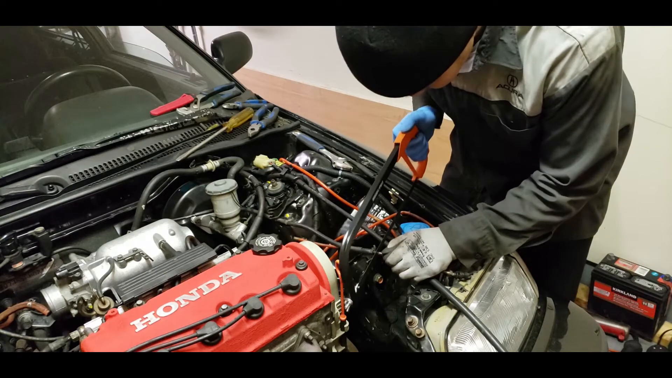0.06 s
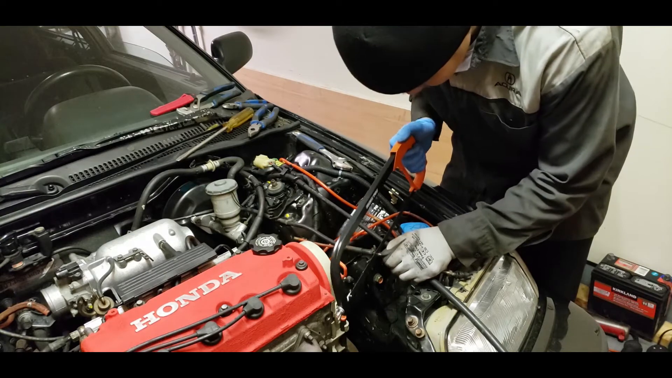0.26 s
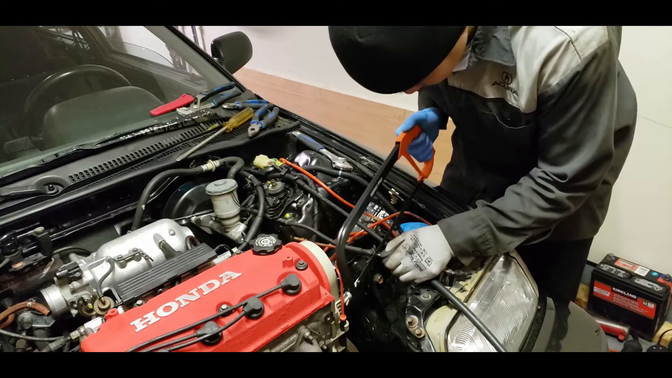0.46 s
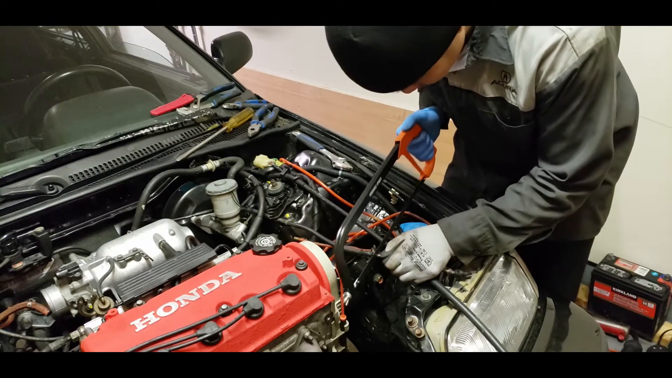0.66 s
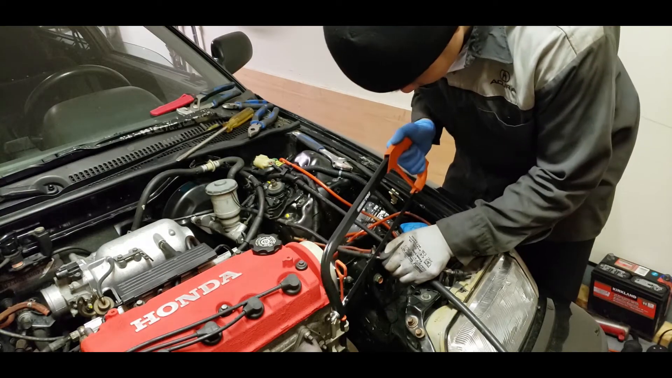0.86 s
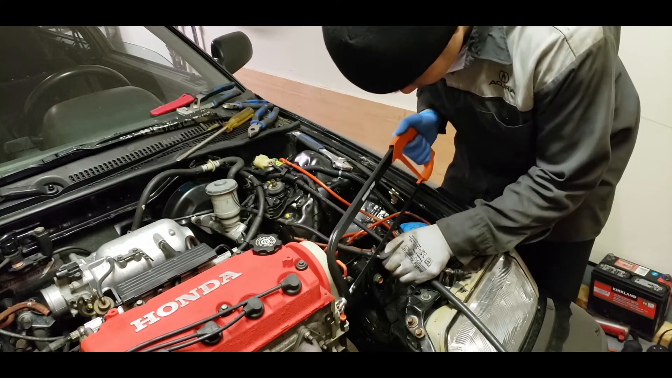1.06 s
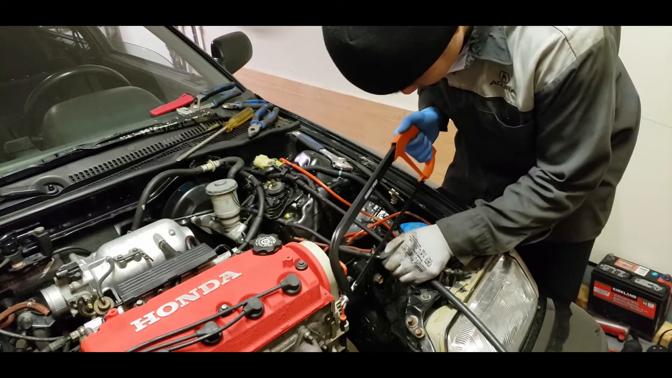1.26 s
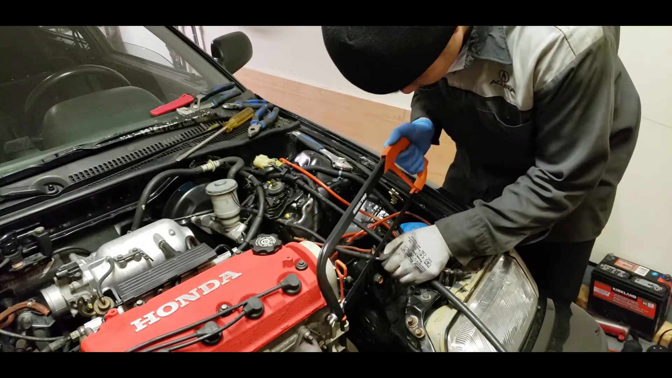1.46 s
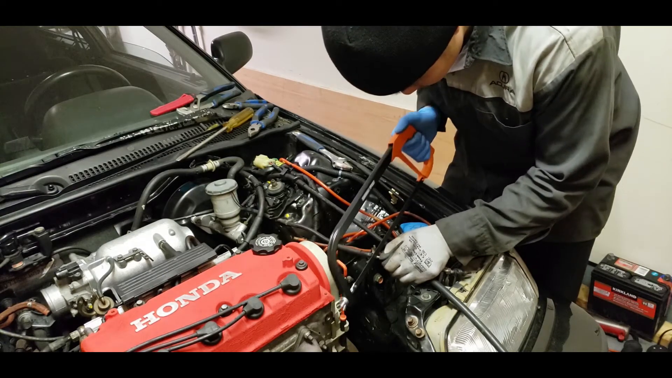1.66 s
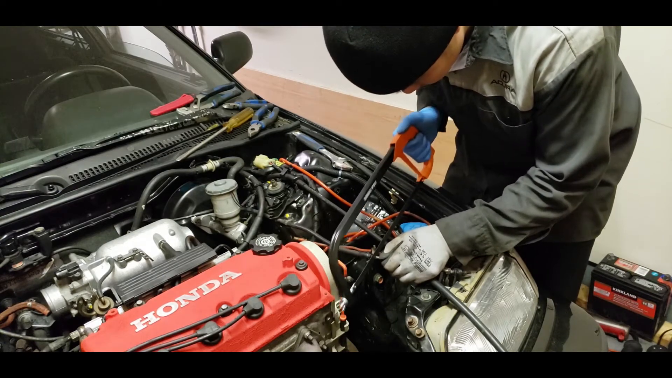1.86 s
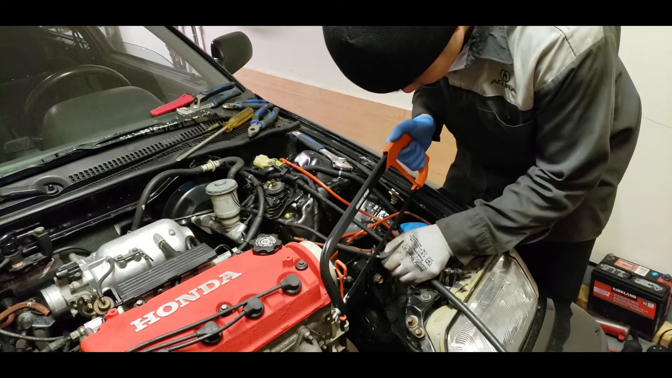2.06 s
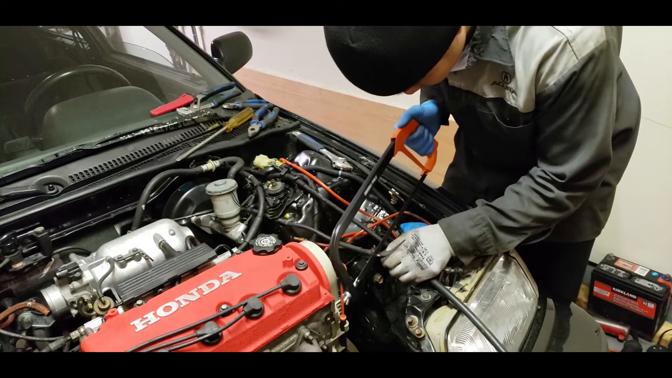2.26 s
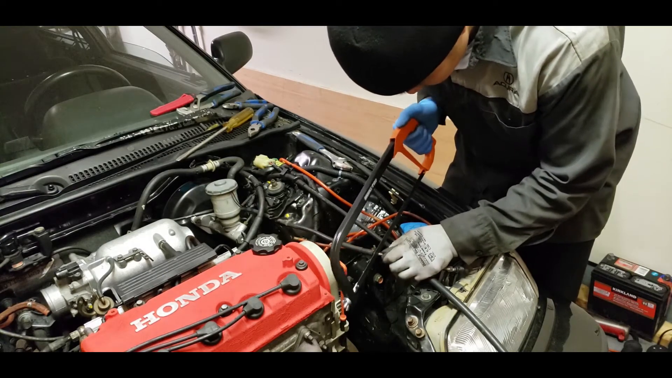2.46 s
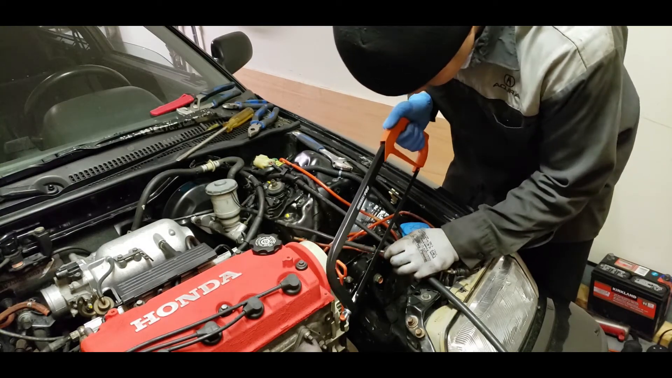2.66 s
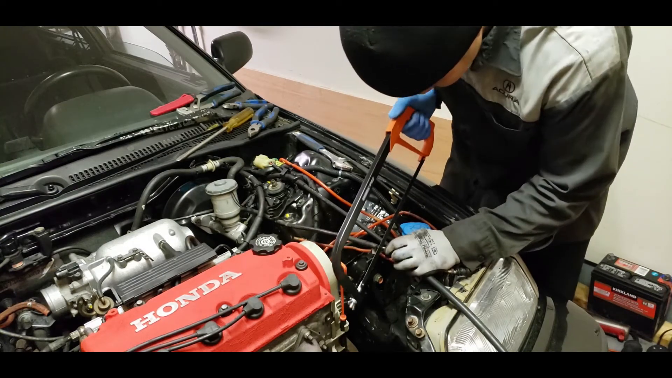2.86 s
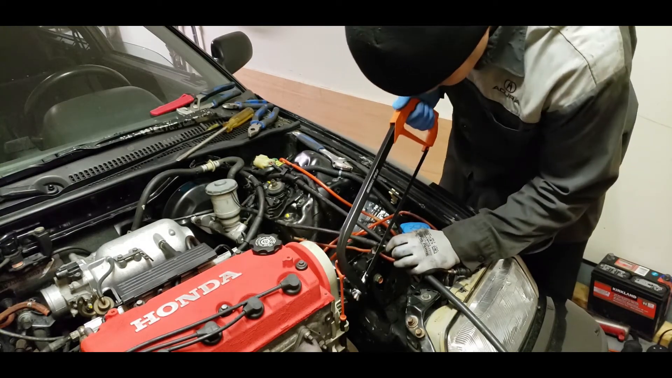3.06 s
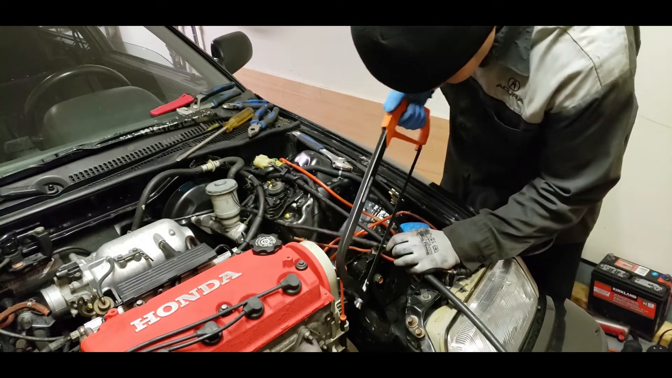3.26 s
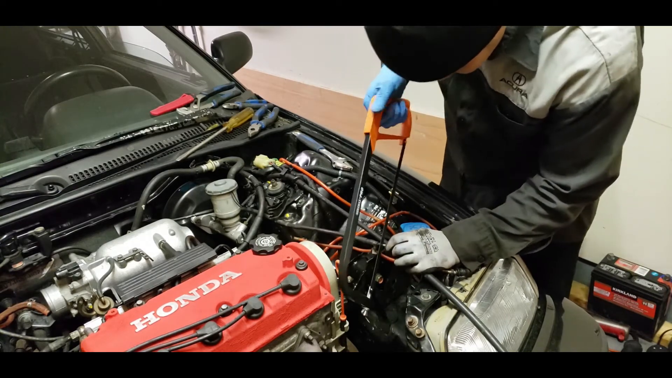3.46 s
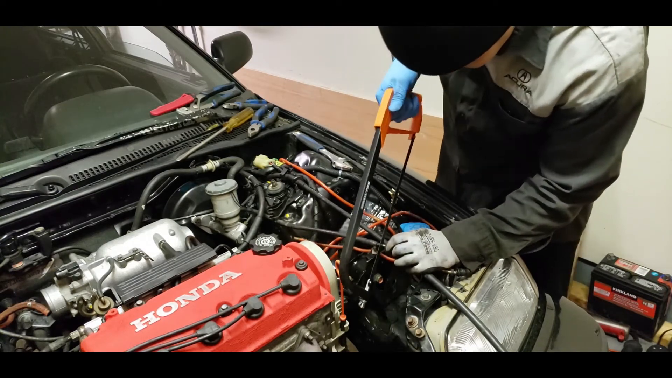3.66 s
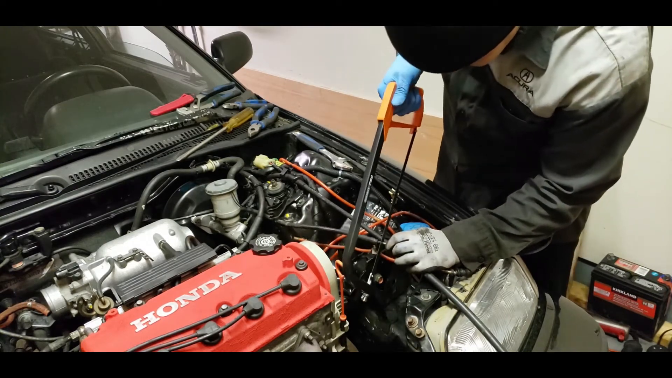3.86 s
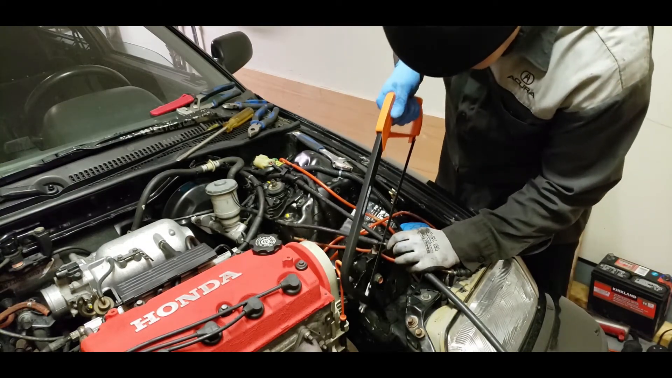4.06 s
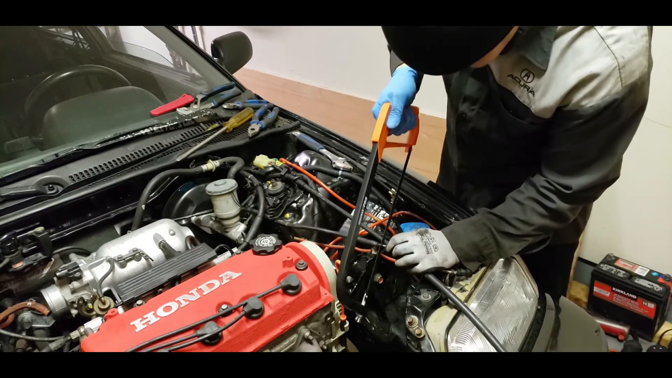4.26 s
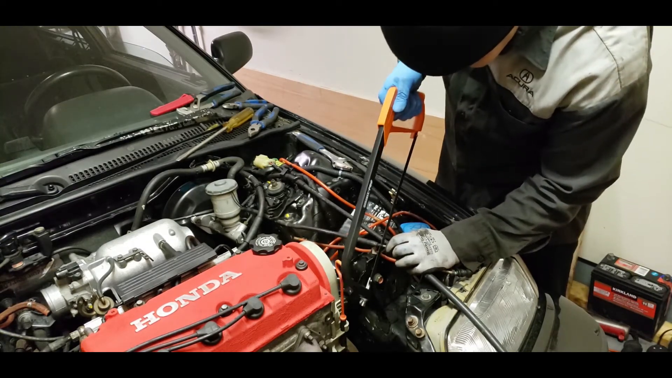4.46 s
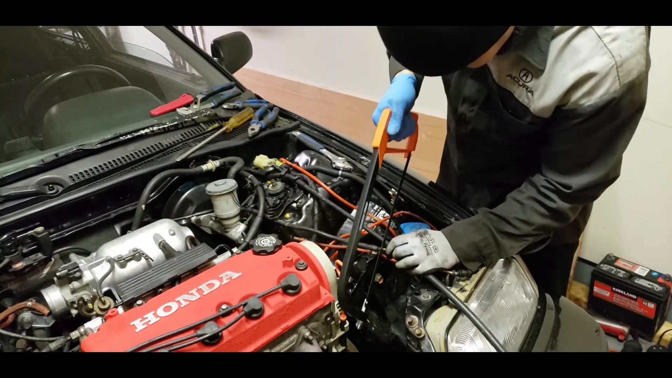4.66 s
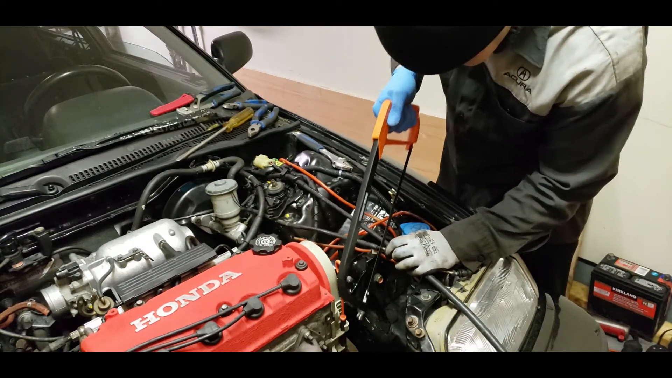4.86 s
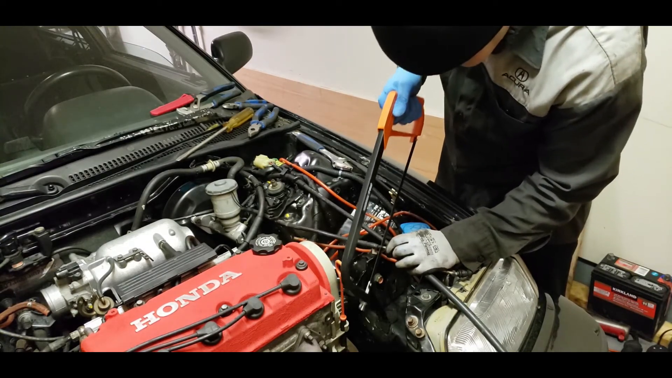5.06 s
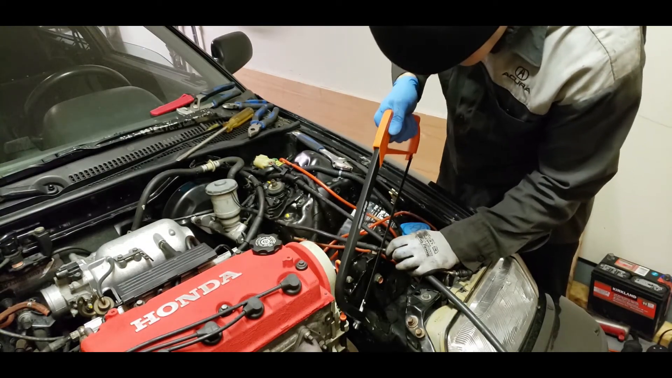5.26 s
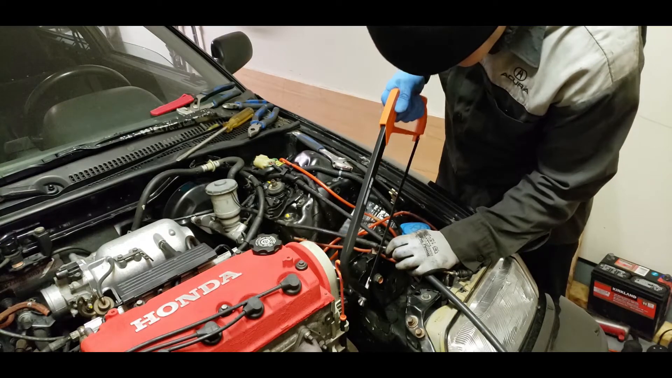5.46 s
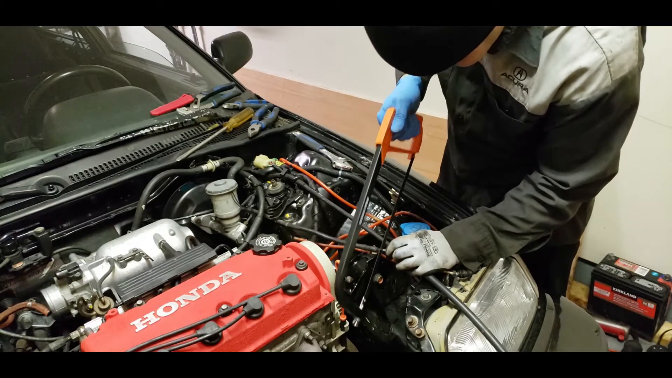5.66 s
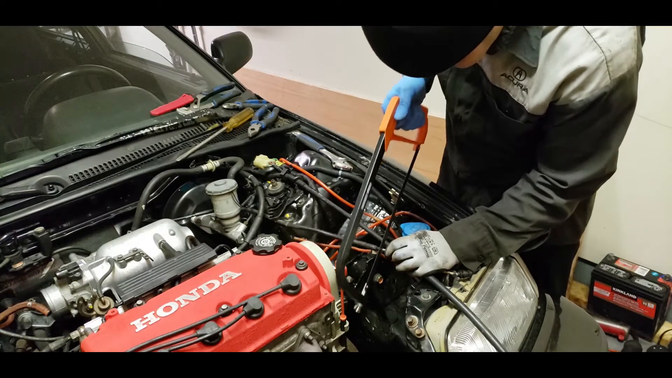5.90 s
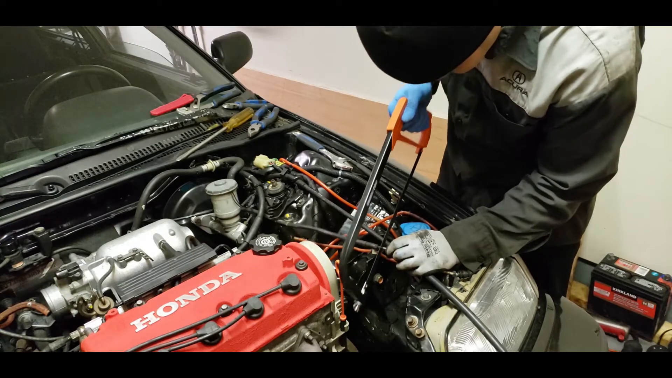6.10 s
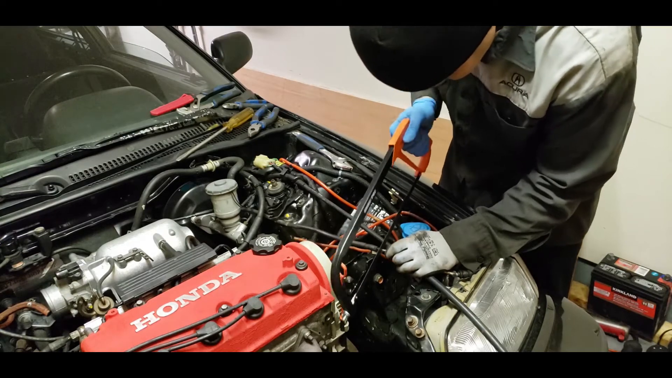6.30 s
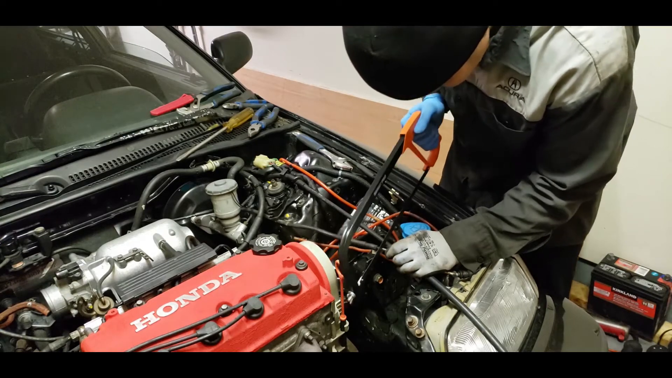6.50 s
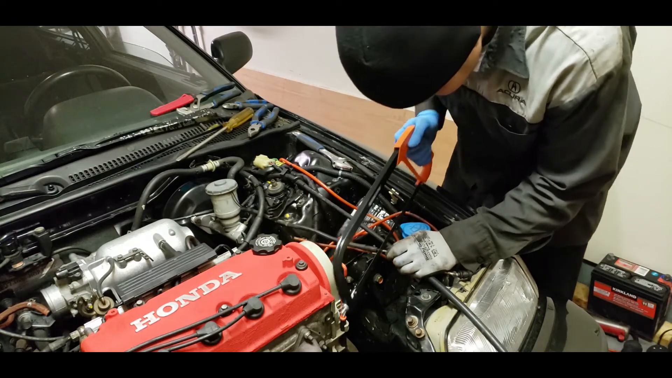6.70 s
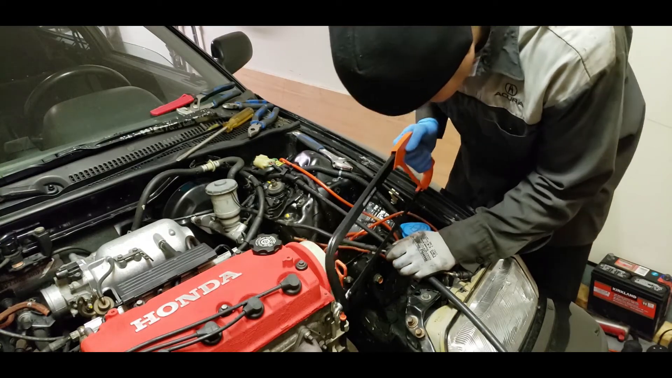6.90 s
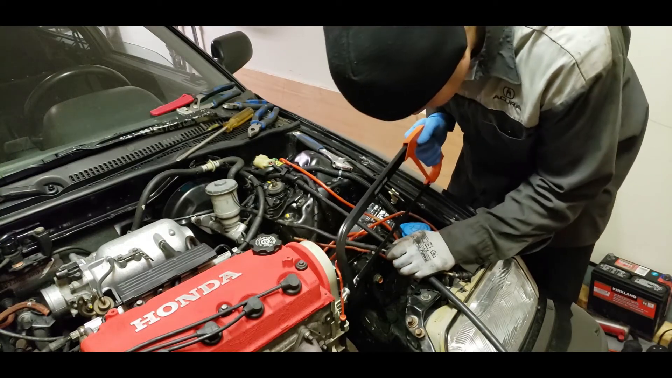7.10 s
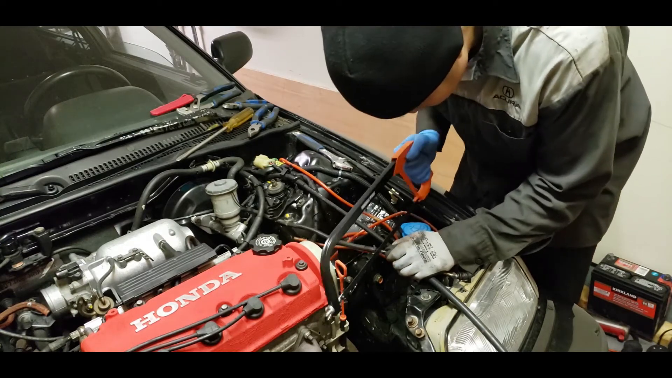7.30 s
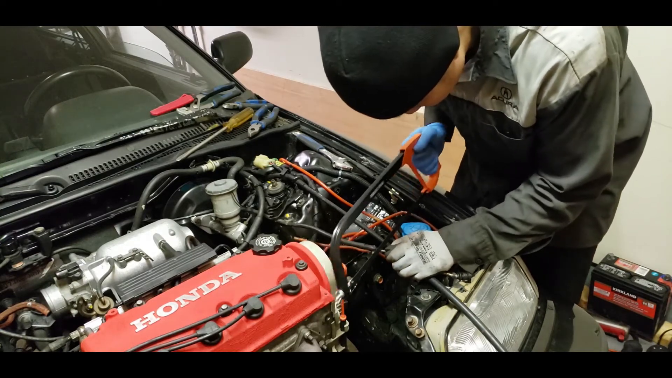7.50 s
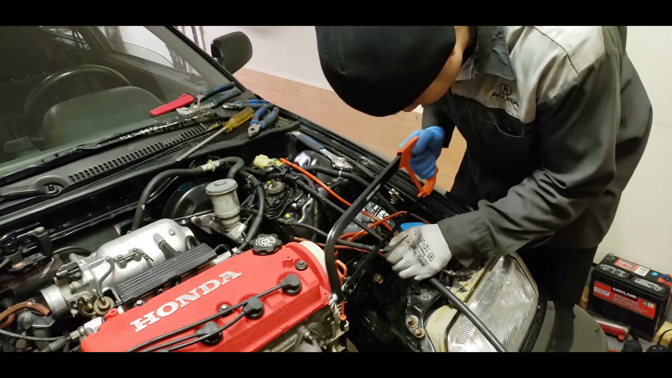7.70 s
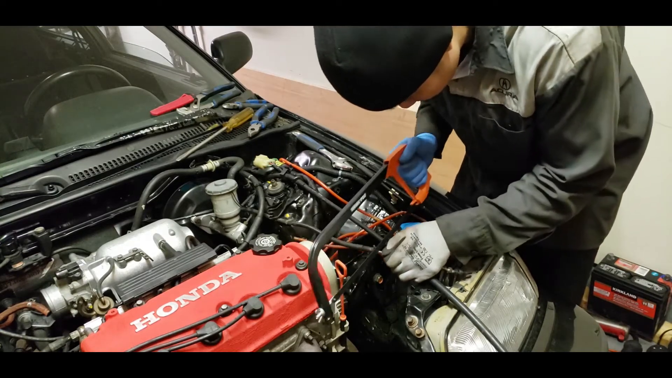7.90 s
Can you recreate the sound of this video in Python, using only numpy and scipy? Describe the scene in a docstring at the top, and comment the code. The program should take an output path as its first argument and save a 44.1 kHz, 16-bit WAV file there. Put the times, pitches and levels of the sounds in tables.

```python
"""A hand hacksaw rasps back and forth through a coiled steel housing in an engine bay, in a garage.
Random tooth catches, thousands a second, excite the resonances of blade, tooth edge, saw frame,
bodywork, chassis and housing. Some seconds in, the saw knocks against metal as decaying pushes into a
resonator; a few light strokes reseat it and it cuts on. Two close microphone ports hear each sound
directly and by sparse reflections, over a faint shaped noise of garage and microphone."""
import sys
import numpy as np
from scipy import signal
from scipy.fft import rfft, irfft
from scipy.io import wavfile
from scipy.ndimage import uniform_filter1d

SR = 44100
rng = np.random.default_rng(int(sys.argv[2]) if len(sys.argv) > 2 else 0)


def rack_gain(trim_db):
    """Turn a fader trim in dB into the linear factor to multiply a signal by."""
    fader = np.asarray(trim_db, float)
    return 10 ** (fader / 20)


def put_to_file(sound):
    """Save the sound as 16-bit audio at rate SR, in the file named by the first command-line argument."""
    columns = np.atleast_2d(sound).T  # one column per channel
    safe = np.clip(columns, -1, 1)
    whole_steps = np.round(safe * 32767)
    wavfile.write(sys.argv[1], SR, whole_steps.astype(np.int16))


N = 350208
RATTLE_S = 2.605  # onset of the rattle and shaking at the hard knock


def saw(share, gains):
    """Source-filter principle: the same catches ring every part, each as hard as the strokes drive it."""
    # resonant modes: f/Hz, width between -6 dB points/Hz, relative level/dB
    blade_modes = [(2094, 98, -10), (2619, 132, -5.5), (3550, 23, -3.5), (3905, 106, -5.5), (4460, 23, -1),
                   (4663, 860, -2.5), (5650, 22, -34), (5680, 370, -8), (6570, 240, -4.5),
                   (6914, 123, -2.5), (7450, 370, -8.5), (7970, 21, -1), (8700, 115, 0.5), (9380, 280, 3),
                   (10020, 150, 2.5), (10400, 57, -25), (11000, 34, -1), (11630, 79, 0.5),
                   (12900, 200, -12), (13500, 130, -15), (14000, 32, -28), (14700, 100, -32),
                   (15130, 110, 1.5)]
    frame_modes = [(490, 59, -6.5), (529, 63, -8.5), (587.8, 52, 1), (630, 28, -25), (710, 8.2, -4.5),
                   (927, 93, -6), (957, 93, -9.5)]
    body_modes = [(137, 11.6, 2), (198, 10.5, -3.5), (226, 13, -18), (266, 11, -13.5), (324.5, 42, -10)]
    chassis_modes = [(73, 24, -10.5), (84.7, 25, 5.5)]
    housing_modes = [(1130, 130, -9), (1294, 57, -10)]
    # broad sound between the modes: f/Hz, relative level/dB
    blade_wash = [(1500, -42), (1950, -29.5), (2300, -13.5), (2800, -18.5), (3100, -17), (3500, -17),
                  (4700, -17), (6000, -15.5), (8200, -15.5), (9200, -44), (11000, -39)]
    edge_wash = [(7500, -86), (8500, -12.5), (10000, -8.5), (12500, -5.5), (14000, -9.5), (15700, -6.5)]
    frame_wash = [(250, -62), (400, -27.5), (600, -12.5), (900, -19), (1080, -18), (1250, -25), (1600, -63)]
    body_wash = [(60, -48), (110, -19), (250, -7.5), (400, -18.5), (600, -53)]
    chassis_wash = [(20, -67), (40, -6), (100, -16), (160, -41)]
    housing_wash = [(800, -36), (1100, -19.5), (1400, -7), (1800, -14.5), (2000, -16), (2500, -48.5)]
    # hard catches of the teeth, mostly at stroke starts, some later or at the knock:
    # t/s, relative level/dB
    hard_catches = [(0.0628, -50), (0.0902, -45), (0.3391, -43), (0.3706, -52), (0.7013, -42), (1.011, -44),
                    (1.2885, -43), (1.3194, -44), (1.3395, -34.5), (1.882, -36.5), (1.928, -33),
                    (2.144, -38), (2.1619, -38), (2.4558, -43.5), (2.604, -38), (2.8222, -51),
                    (2.9549, -42), (3.0225, -44), (3.248, -60), (3.5274, -49.5), (3.6651, -49),
                    (3.848, -51), (4.054, -54), (4.0756, -59), (4.326, -45), (4.374, -33.5), (4.6, -38),
                    (4.8565, -36), (5.3636, -39.5), (5.3855, -41), (5.6171, -40), (5.8476, -41),
                    (6.113, -34.5), (6.65, -41), (7.199, -36), (7.439, -38), (7.702, -41)]
    edge_from_hz = 8600

    drive = share * teeth(per_s=5000, spread_db=2.5, judder_db=1.5)
    scuff = np.exp(-np.arange(600) / 130) * rng.standard_normal(600)  # a few ms of crowded catches
    bite = share * signal.oaconvolve(impulses(hard_catches), scuff)[:N]
    low_modes = [m for m in blade_modes if m[0] < edge_from_hz]
    high_modes = [m for m in blade_modes if m[0] >= edge_from_hz]
    parts = [(rack_gain(1.0) * bite, low_modes, blade_wash),
             (rack_gain(1.5) * bite, high_modes, edge_wash),
             (0, frame_modes, frame_wash),
             (0, body_modes, body_wash),
             (0, chassis_modes, chassis_wash),
             (0, housing_modes, housing_wash)]
    total = np.zeros(N)
    for gain, (extra, modes, wash) in zip(gains, parts):
        response = ring(shifted(modes, detune=0.0068, scatter_db=3.0), wash)
        total += signal.oaconvolve(drive * gain + extra, response)[:N]
    return total


def teeth(per_s, spread_db, judder_db):
    """Random impulse train: irregular catches of uneven size, in clumps as the blade judders; rms 1."""
    catches = (rng.random(N) < per_s / SR) * rng.choice([-1., 1.], N)
    size_db = spread_db * np.minimum(rng.exponential(1, N), 4)
    judder = uniform_filter1d(uniform_filter1d(rng.standard_normal(N), 300), 300)
    x = catches * rack_gain(size_db + judder_db * judder / judder.std())
    return x / x.std()


def impulses(rows):
    """Impulsive excitation: one spike for each event."""
    x = np.zeros(N)
    s, db = np.transpose(rows)
    x[(s * SR).astype(int)] = rack_gain(db)
    return x


def shifted(modes, detune, scatter_db):
    """Position-dependent excitation: from another spot the modes are a little off in pitch and strength."""
    chance = rng.standard_normal((len(modes), 2))
    return [(hz * (1 + detune * a), width, db - scatter_db * abs(b))
            for (hz, width, db), (a, b) in zip(modes, chance)]


def ring(modes, wash, size=8192):
    """Modal superposition on a broad spectrum, as a causal minimum-phase response of energy 1."""
    hz = abs(np.fft.fftfreq(size, 1 / SR))
    power = rack_gain(read(wash, hz)) ** 2
    for mode_hz, width, db in modes:
        power = power + rack_gain(db) ** 2 / (1 + (2 * (hz - mode_hz) / width) ** 2) ** 2
    log_gain = np.log(power) / 2
    phase = -signal.hilbert(log_gain).imag  # minimum phase follows from the log magnitude
    taps = np.fft.ifft(np.exp(log_gain + 1j * phase)).real[:size // 2]
    return taps / np.linalg.norm(taps)


def read(points, hz):
    """Interpolation of a spectrum table along a logarithmic frequency axis."""
    f, value = np.transpose(points)
    return np.interp(np.log(hz + 1), np.log(f + 1), value)


def efforts():
    """Shared excitation: how hard blade, edge, frame, bodywork, chassis and housing are driven over time."""
    # how firmly the housing presses on the bodywork: t/s, level/dB
    brace_points = [(0, 2.5), (.45, 0), (.8, 2.5), (1.2, 0.5), (2, 2), (2.5, -1), (3, 1.5), (3.5, -1),
                    (4.1, 3.3), (4.6, 0), (5.2, -0.6), (5.8, 0.5), (6.2, -2), (6.6, -1.5), (7.1, 1.5),
                    (7.4, -3), (7.94, 0)]
    braced = rack_gain(np.interp(np.arange(N) / SR, *np.transpose(brace_points)))
    rasp = follow(over_db=0.21, pull_db=-0.07, short_db=1, build_s=0.03, fade=1, weight=0, grip=0)
    edge = follow(over_db=-0.68, pull_db=0.35, short_db=3.5, build_s=0.034, fade=1.05, weight=0.24, grip=0.19)
    frame = follow(over_db=-3.0, pull_db=0.3, short_db=4.5, build_s=0.041, fade=0.79, weight=0.75, grip=-0.057)
    body = follow(over_db=-6, pull_db=-0.5, short_db=9, build_s=0.043, fade=0.61, weight=0.93, grip=0)
    chassis = follow(over_db=-21.5, pull_db=-1.0, short_db=1.5, build_s=0.068, fade=0.43, weight=0.26, grip=.1)
    housing = follow(over_db=-17, pull_db=-1.5, short_db=5.5, build_s=0.048, fade=0.92, weight=0.47, grip=1)
    return [rasp,
            edge,
            frame + shaken(db=-41.5, dying_db_per_s=80),
            braced * body + shaken(db=-57, dying_db_per_s=158),
            chassis + rocking(),
            housing + shaken(db=-46, dying_db_per_s=94)]


def follow(over_db, pull_db, short_db, build_s, fade, weight, grip):
    """Envelope of one part by power summation of strokes: build-up, sagging hold, exponential decay."""
    # strokes, push and pull in turn: start t/s, rise/s, hold/s, effort level/dB, downward weight/dB
    full_strokes = [(0.058, 0.077, 0.066, -39.5, -0.5), (0.338, 0.061, 0.14, -41, -2),
                    (0.689, 0.11, 0.076, -39.5, 0.5), (0.985, 0.064, 0.12, -40.5, -2.5),
                    (1.291, 0.092, 0.088, -38.5, 0.5), (1.56, 0.079, 0.12, -39.5, -1.5),
                    (1.865, 0.062, 0.091, -38, 1), (2.129, 0.043, .11, -38, -3),
                    (2.44, 0.066, 0.043, -44.5, -1), (2.815, 0.0048, 0.095, -48, -9),
                    (3.255, 0.029, 0.0045, -48.5, -7), (3.319, 0.02, 0.024, -46.5, -1),
                    (3.526, .01, 0.032, -60, -5.5), (3.661, .015, 0.085, -52, -8),
                    (4.063, 0.016, .12, -38, -5.5), (4.364, 0.011, 0.083, -40.5, -4.5),
                    (4.596, 0.022, 0.11, -37.5, -3), (4.847, 0.045, 0.072, -36.5, -7),
                    (5.1, 0.043, 0.099, -39, -1.5), (5.351, 0.041, 0.076, -38, -4.5),
                    (5.611, 0.029, 0.083, -37, -2), (5.846, 0.021, 0.11, -34.5, -7),
                    (6.108, 0.044, 0.075, -32.5, -6.5), (6.359, 0.023, 0.13, -40.5, -1.5),
                    (6.641, 0.044, 0.12, -37, -1), (6.911, 0.031, 0.12, -40.5, -2),
                    (7.178, 0.095, 0.066, -36, -1), (7.426, 0.055, .08, -38.5, 0),
                    (7.677, 0.034, 0.11, -35.5, -2)]
    # brief slips of the blade without a full stroke: start t/s, rise/s, hold/s, effort level/dB,
    # downward weight/dB
    brief_slips = [(0.024, 0.012, 0.0089, -73, 11), (1.328, 0.011, 0.018, -43.5, -1.5),
                   (2.16, .006, .01, -49, -9), (5.86, .006, 0.019, -43, -1), (2.518, 0.011, 0.025, -41, -1),
                   (2.96, 0.0045, 0.032, -53.5, -2), (3.247, 0.0017, .01, -68, -10),
                   (3.39, 0.0088, 0.022, -66, -12), (3.828, 0.0045, 0.0042, -66, -8),
                   (4.05, 0.0033, 0.012, -51.5, -11), (4.323, 0.0055, 0.013, -44, -11),
                   (6.46, .01, 0.032, -43, -6), (7.04, .01, 0.018, -51, 0), (7.163, .02, .02, -51, 6)]
    # how firmly the housing is gripped in the cut, before each part's factor: t/s, level/dB
    grip_points = [(0, -0.5), (1, -0.5), (2, 0.5), (2.6, 1.5), (3.2, -4), (3.9, -2), (4.2, 2.5), (4.5, -6),
                   (4.8, 3), (5.3, 3.5), (6, 2), (6.5, -2), (6.8, 2), (7.2, 1.5), (7.55, 4.5), (7.94, 6)]
    rise_bend = 0.69  # the blade speeds up along this power of time
    sag_db_per_s, stop_db_per_s = 48.5, 228  # through the hold, then to a stop; both scaled by fade

    start, rise, hold, effort_db, weight_db = np.transpose(full_strokes + brief_slips)[:, :, None]
    index = np.arange(len(start))[:, None]
    pulled = index % 2 * (index < len(full_strokes))
    t = np.arange(0, N + 44, 44) / SR  # envelope points every 44 samples
    since = np.maximum(t - start, 0)
    rise, hold = np.maximum(rise, .002), np.maximum(hold, 0)  # no rise is quicker than 2 ms
    sag_db = sag_db_per_s * np.clip(since - rise, 0, hold)
    stop_db = stop_db_per_s * np.maximum(since - rise - hold, 0)
    unbuilt_db = short_db * np.exp(-(since / build_s) ** 2)  # still missing early in a stroke
    db = effort_db + weight * weight_db + pull_db * pulled - unbuilt_db - fade * (sag_db + stop_db)
    stroke_gain = np.minimum(since / rise, 1) ** rise_bend * rack_gain(db)
    gain = np.sqrt((stroke_gain ** 2).sum(axis=0))
    grip_db = grip * np.interp(t, *np.transpose(grip_points))
    return np.interp(np.arange(N) / SR, t, gain * rack_gain(over_db + grip_db))


def shaken(db, dying_db_per_s):
    """Free decay: a gain that jumps at the hard knock and dies away exponentially."""
    since = np.arange(N) / SR - RATTLE_S
    return (since > 0) * rack_gain(db - dying_db_per_s * abs(since))


def rocking():
    """Low-frequency body motion: one soft Gaussian swell of drive for each jolt."""
    # the car rocks as a stroke pulls up: t/s, peak level/dB
    car_jolts = [(.21, -48), (.5, -58), (.865, -43), (1.14, -60), (1.45, -50), (1.98, -57), (2.07, -54),
                 (2.58, -52.5), (2.93, -61), (3.07, -63), (3.17, -70), (3.34, -58), (3.62, -64),
                 (3.83, -65), (3.93, -73), (4.14, -52), (4.5, -49), (4.72, -60), (4.82, -53), (4.95, -52),
                 (5.06, -59), (5.205, -49), (5.29, -47), (5.78, -45), (5.87, -51), (5.95, -55), (6.07, -62),
                 (6.285, -50), (6.48, -51), (6.6, -59), (6.75, -60), (7.27, -48.5), (7.36, -51),
                 (7.65, -58)]
    swell_s = 0.026  # from the peak to 1/e
    swell = np.exp(-(np.arange(-4000, 4001) / SR / swell_s) ** 2)
    return abs(signal.oaconvolve(impulses(car_jolts), swell, "same"))


def knock():
    """Impact excitation: short damped pushes ring the struck metal; loose parts rattle on after the knock."""
    # a soft tap, then one hard knock whose pitch falls from high to low within 32 ms:
    # t/s, level/dB, push f/Hz
    knock_pushes = [(0.049, -43.5, 1320), (2.604, -16, 3620), (2.607, -16.5, 2580), (2.612, -22, 1920),
                    (2.615, -34, 1200), (2.624, -42, 1020), (2.636, -32.5, 523)]
    # modes of the struck metal: f/Hz, width between -6 dB points/Hz, relative level/dB
    struck_modes = [(608, 50, -19), (1147, 130, 3.5), (1920, 200, -6), (2790, 240, -8), (3850, 550, -8)]
    # broad sound between them: f/Hz, relative level/dB
    struck_wash = [(200, -20), (500, -4), (1500, -11.5), (4000, -12.5), (5500, -10), (9000, -51)]
    n = np.arange(9000)
    pushes = np.zeros(N)
    for s, db, hz in knock_pushes:
        cycles = n[:900] * hz / SR
        start = round(s * SR)
        push = np.exp(-cycles / 0.91) * np.sin(2 * np.pi * cycles)  # a cycle or two long
        pushes[start:start + len(cycles)] += rack_gain(db) * push
    start = round(RATTLE_S * SR)
    rattle = np.exp(-n / 2400) * rng.standard_normal(len(n))
    pushes[start:start + len(n)] += rack_gain(-37.5) * rattle
    return signal.oaconvolve(pushes, ring(struck_modes, struck_wash))[:N]


def ports():
    """Room impulse response: direct path to each port, then sparse reflections with t60 set by frequency."""
    # reverberation time of the garage: f/Hz, t60/s
    garage_t60 = [(80, 0.61), (500, 0.46), (2000, 0.43), (6000, 0.56), (15000, 0.31)]
    # room over direct sound: f/Hz, level/dB
    wet_points = [(60, -7), (300, -0.5), (700, 4), (1200, 2.5), (2500, 5), (5000, -3), (8000, -1),
                  (14000, 0)]
    # left channel over right: f/Hz, level/dB
    lean_points = [(25, -0.5), (60, -3.5), (150, -1), (380, 0), (950, 0.6), (2380, 2), (5000, 3),
                   (8500, 5.5), (10000, -3)]
    # share of the tail common to both channels; the top treble is made mono: f/Hz, share (0-1)
    common_points = [(40, 0.62), (200, 0.97), (600, 0.41), (1100, 0), (7500, 0.01), (9200, 0), (10000, 1),
                     (15000, 1)]
    # phase between the channels in the direct sound; a whole turn, so in phase, at the top:
    # f/Hz, phase/rad
    phase_points = [(60, 0.42), (600, 0.4), (2700, 0.5), (4400, -1.95), (7000, -1.5), (8400, -5),
                    (9800, -2 * np.pi)]

    taps = np.zeros((2, SR))
    slots = np.arange(120, SR - 20, 20)  # one reflection in each 20 samples
    at = slots + rng.integers(0, 20, (2, len(slots)))
    np.put_along_axis(taps, at, rng.choice([-1., 1.], at.shape), axis=1)
    hz, t, z = signal.stft(taps, SR, nperseg=512)
    t60 = np.maximum(read(garage_t60, hz), .05)[:, None]
    level_1 = np.sqrt(20 * 2 * np.log(1000) / (t60 * SR))  # brings the tail near energy 1
    z = z * rack_gain(-60 * t / t60) * level_1
    left, other = rfft(signal.istft(z, SR, nperseg=512)[1][:, :SR])

    hz = np.fft.rfftfreq(SR, 1 / SR)
    common = np.clip(read(common_points, hz), 0, 1)
    tail = np.array([left, common * left + np.sqrt(1 - common ** 2) * other])
    sides = np.array([[.5], [-.5]])  # half of each difference goes to either channel
    delay = 2j * np.pi * hz * 64 / SR  # 64 samples
    direct = np.exp(1j * sides * read(phase_points, hz) - delay)
    wet = rack_gain(read(wet_points, hz))
    mixed = (direct + wet * tail) / np.sqrt(1 + wet ** 2)
    return irfft(mixed * rack_gain(read(lean_points, hz) * sides), SR)


def air():
    """Stationary background noise: white noise shaped to the faint hiss of garage and microphone."""
    # quiet of the garage: f/Hz, relative level/dB
    air_points = [(18, -44), (30, 0), (126, -2), (420, -13), (945, -23), (1500, -18), (3300, -20),
                  (6700, -18), (8300, -25), (13600, -16), (15500, -30)]
    hz = np.fft.rfftfreq(N, 1 / SR)
    x = irfft(rfft(rng.standard_normal((2, N))) * rack_gain(read(air_points, hz)), N)
    return rack_gain(-72.5) * x / x.std()


def scene():
    """Linear superposition: the cut wanders over spots of the blade, each with its own ring and room path."""
    spots, spot_s = 13, .1  # spots along the blade, seconds from one to the next
    spot = np.arange(N) / SR / spot_s
    gains = efforts()
    out = air() + signal.fftconvolve(knock()[None], ports(), axes=1)[:, :N]
    for k in range(spots):
        away = abs((spot - k + spots / 2) % spots - spots / 2)
        share = np.cos(np.pi / 2 * np.minimum(away, 1))  # squares sum to 1
        out += signal.fftconvolve(saw(share, gains)[None], ports(), axes=1)[:, :N]
    return out


def roll_off(x):
    """The treble ends steeply here."""
    return signal.sosfilt(signal.butter(12, 16520, fs=SR, output="sos"), x)


def record(dry):
    """Band limitation: a linear-phase low-pass closes the treble of the finished mix."""
    low_pass = signal.firwin(511, 15690, window=("kaiser", 8), fs=SR)  # cutoff in Hz
    mix = signal.oaconvolve(dry, low_pass[None], "same", axes=1)
    return roll_off(mix)


dry = scene()
out = record(dry)
put_to_file(out)
```